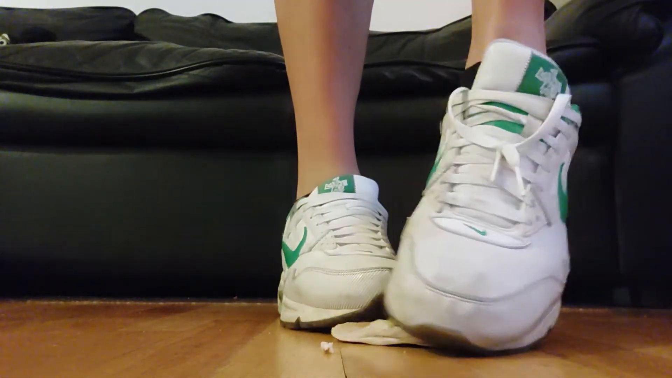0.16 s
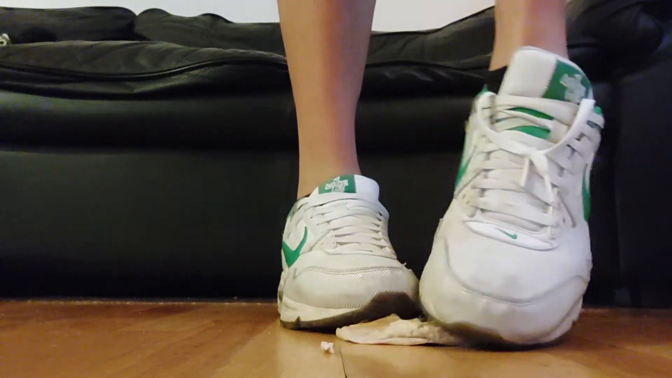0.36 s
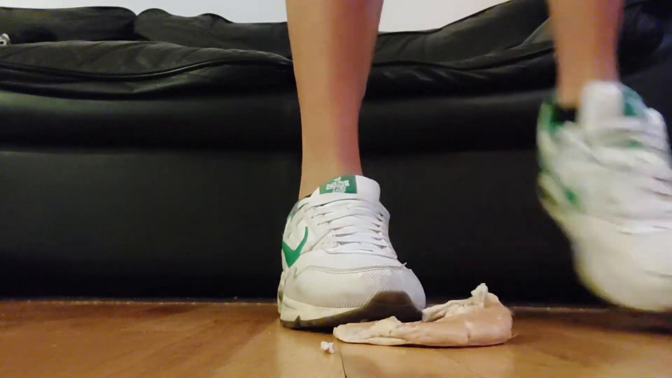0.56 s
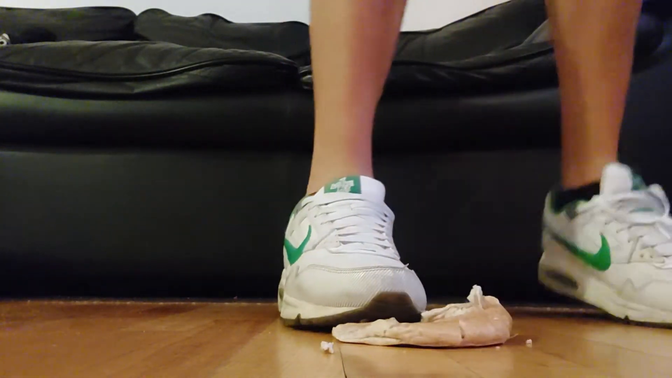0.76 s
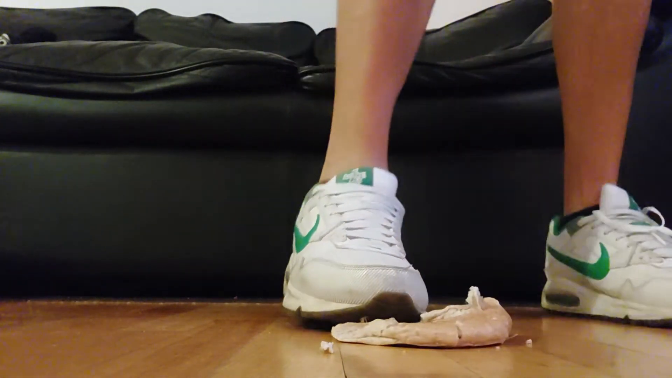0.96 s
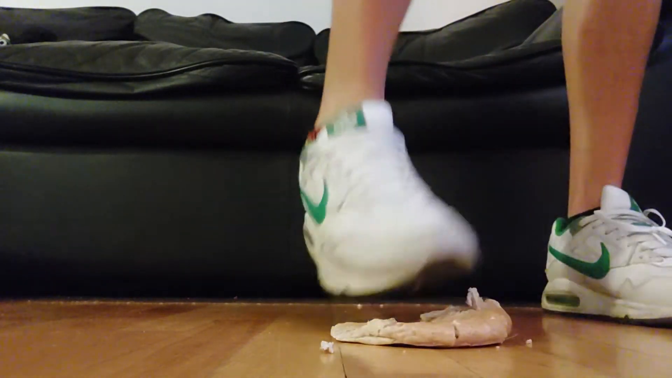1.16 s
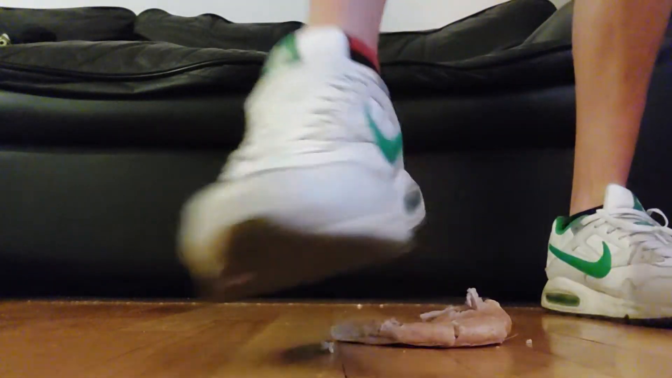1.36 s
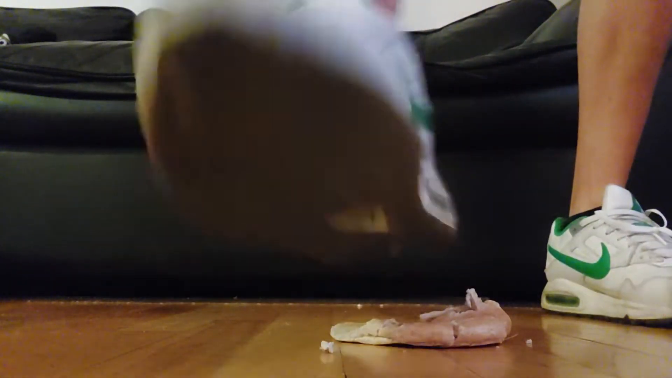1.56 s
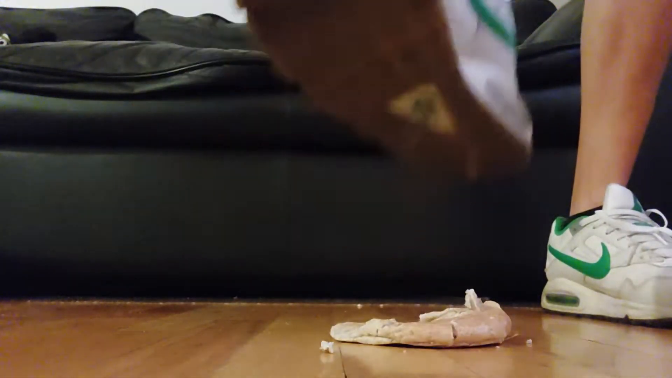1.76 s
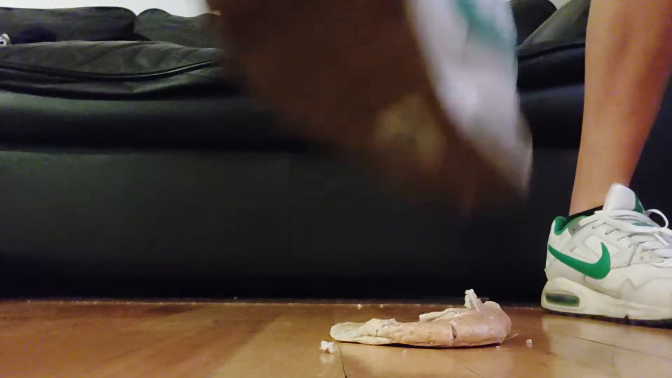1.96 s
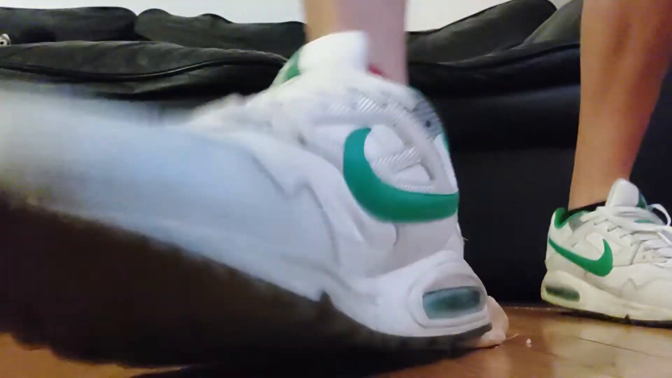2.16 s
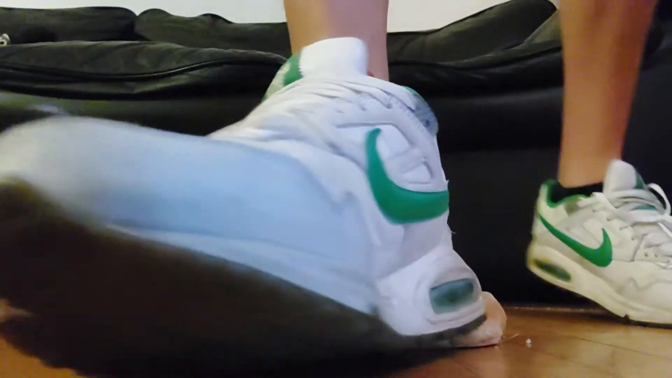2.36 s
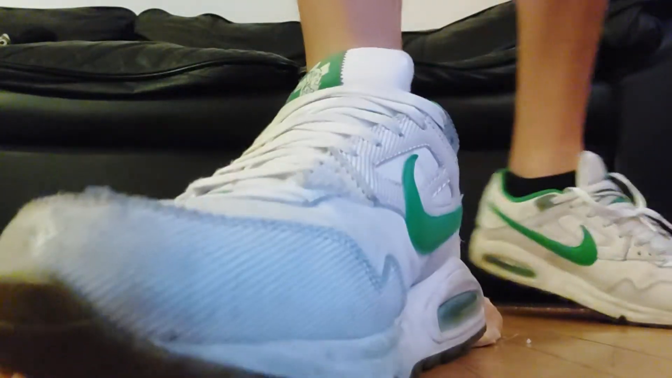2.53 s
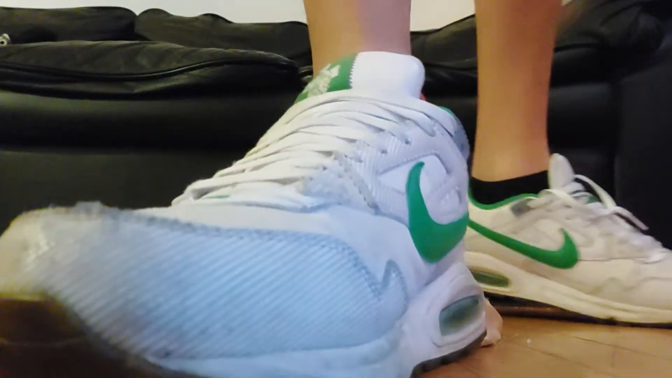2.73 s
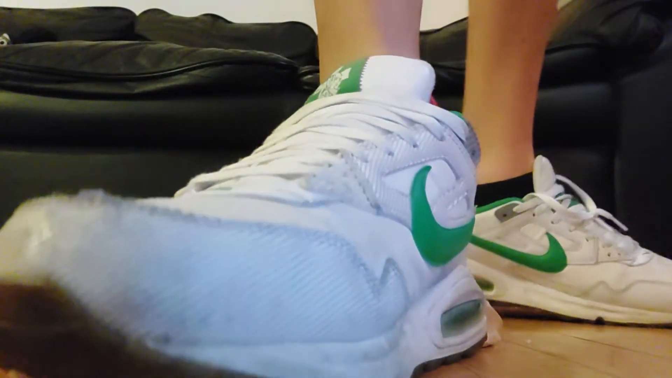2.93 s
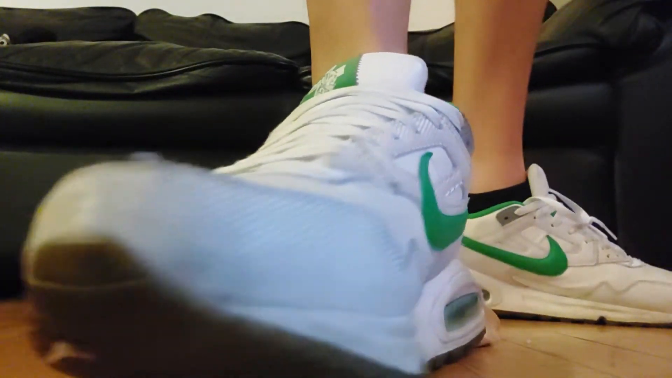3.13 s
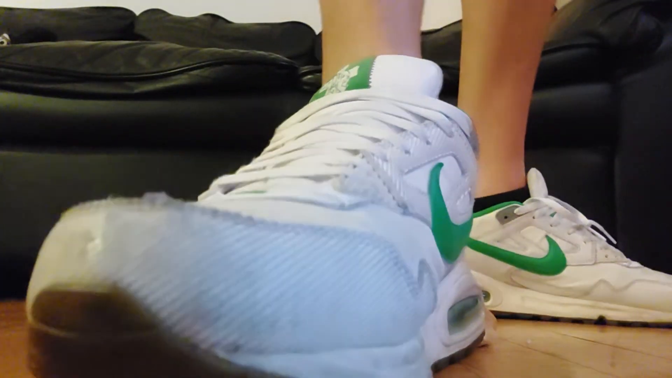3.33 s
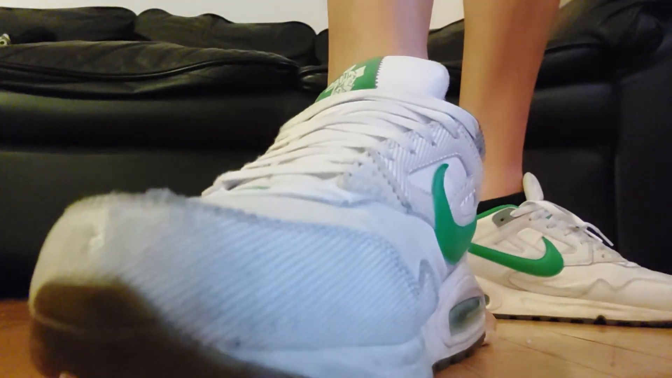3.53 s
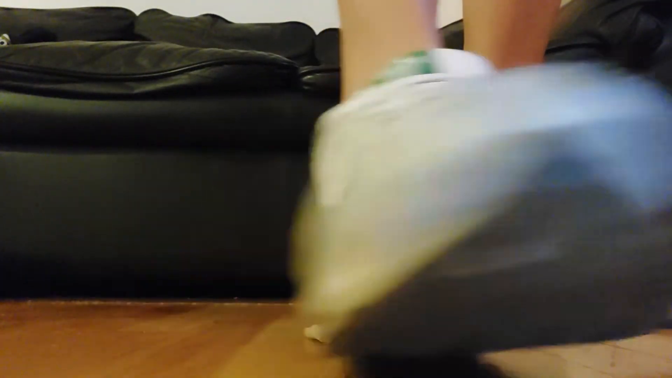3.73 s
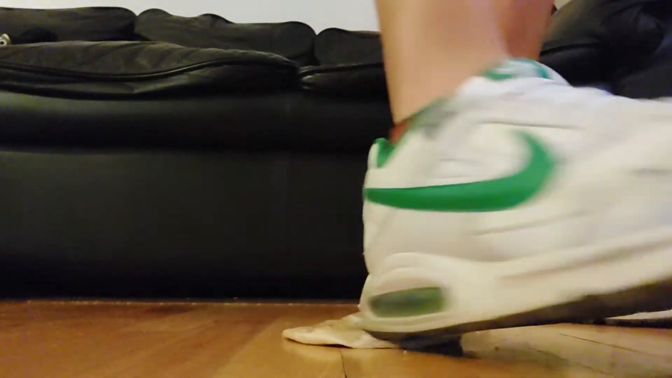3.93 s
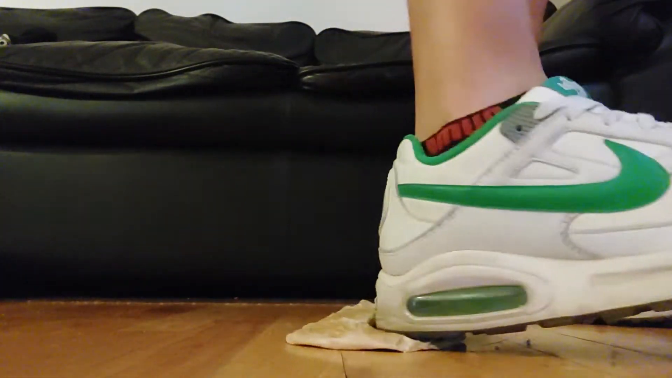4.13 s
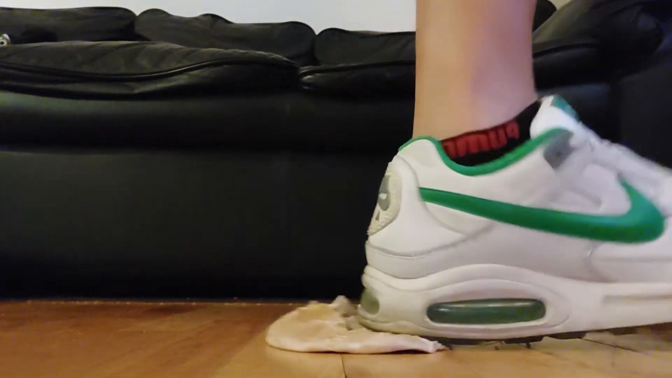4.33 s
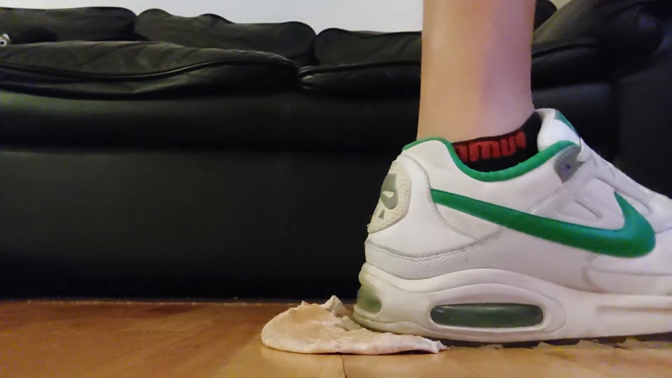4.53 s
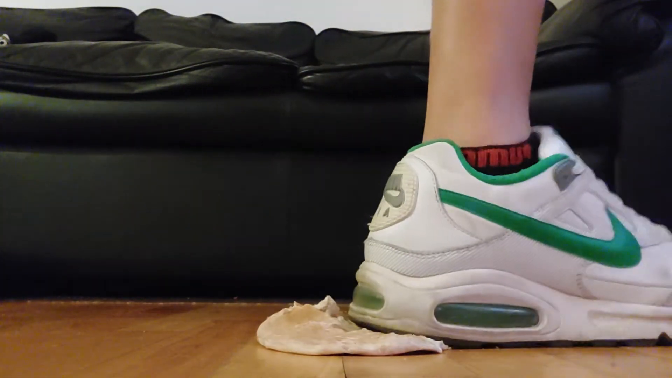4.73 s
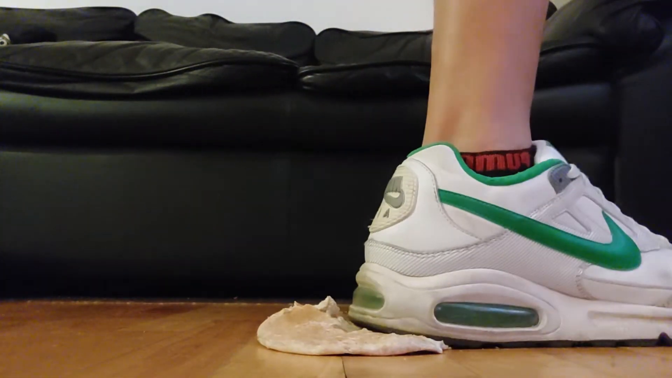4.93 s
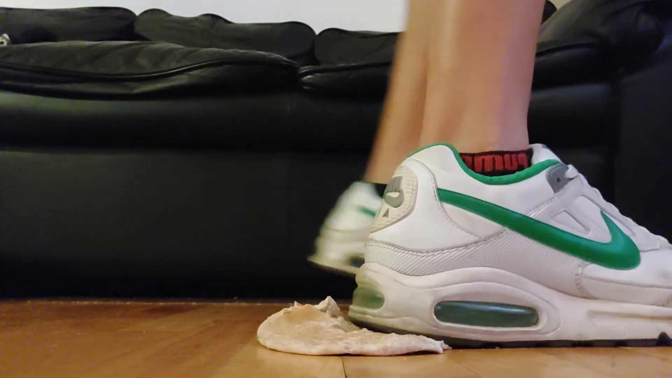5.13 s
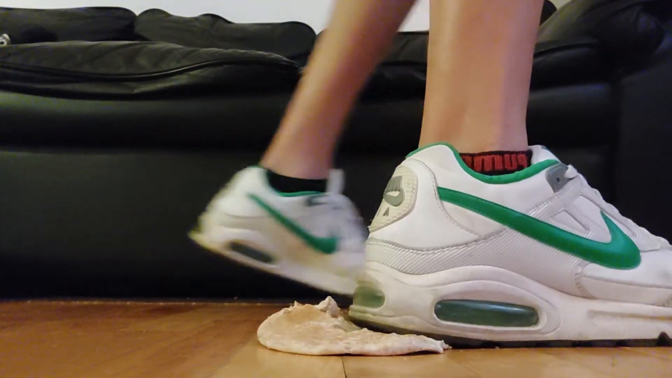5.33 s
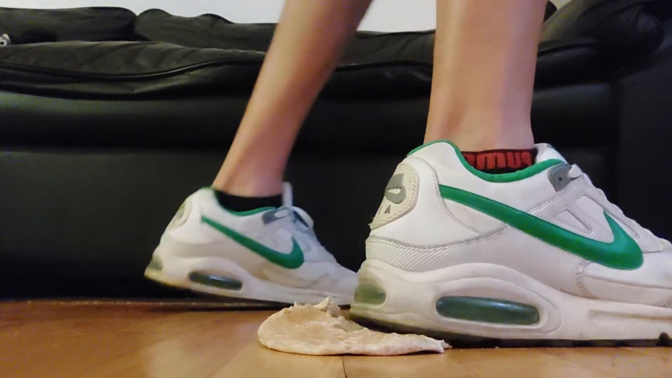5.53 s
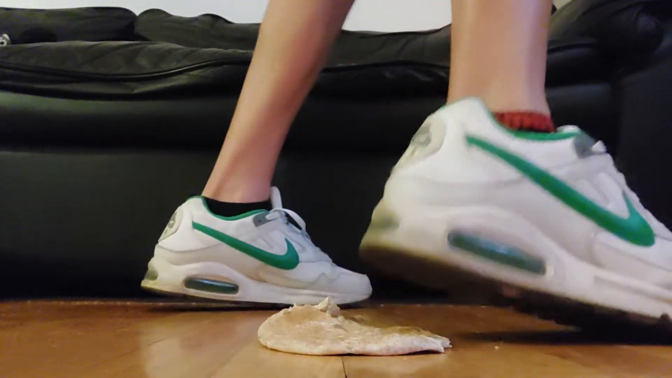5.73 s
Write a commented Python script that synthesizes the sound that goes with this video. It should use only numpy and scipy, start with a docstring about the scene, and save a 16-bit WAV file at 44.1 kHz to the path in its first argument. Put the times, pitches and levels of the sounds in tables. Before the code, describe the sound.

Close stereo pickup at floor level in a small room with low steady hum. Rubber soles tick and scrape grittily over boards and crumbs, with soft footfalls and small shoe creaks. At about two seconds a very loud hollow wooden stomp lands with a short wet, tearing burst of bread. A faint rising rasp, quiet rustling and small steps follow, ending in a moderate thump and scuff.

```python
"""Sneakers on bread

Close by, sneakers step around soft bread on a wooden floor, stomp it flat and grind it.
Footfalls ring the modes of the boards; ticks, creaks and crackles are clicks with set spectra.
Scuffs, rustles and the bursting bread are shaped noise; a thin rasp is noise shifted to a rising pitch.
A small room answers with decaying noise taps, over room noise and a low hum."""
import sys
import numpy as np
from scipy import signal
from scipy.fft import rfft, irfft
from scipy.io import wavfile
from scipy.ndimage import uniform_filter1d

SR = 44100
rng = np.random.default_rng(int(sys.argv[2]) if len(sys.argv) > 2 else 0)


def wav_record(signal):
    """Record a signal, one row per channel, as 16-bit PCM in the file named by sys.argv[1]."""
    frames = np.transpose(np.atleast_2d(signal))
    bounded = np.clip(frames, -1, 1)
    # unit amplitude maps onto the largest positive 16-bit level
    quanta = np.round(bounded * 32767).astype(np.int16)
    wavfile.write(sys.argv[1], SR, quanta)


N = 259308
TIME, HZ = np.arange(N) / SR, np.fft.rfftfreq(N, 1 / SR)
SHORT_HZ = np.fft.rfftfreq(4096, 1 / SR)
# diffuse sound: f/Hz, left-right likeness (0 to 1)
LIKENESS = [(60, 0.71), (300, 0.78), (640, 0.34), (1400, 0.05), (15000, 0.057)]


def boards():
    """Each footfall pushes the floor and wakes the modes near its push pitch."""
    # weight landing: t/s, level/dB, push f/Hz, spread/octaves, ring time as a share (a planted foot damps),
    # room send/dB
    footfalls = [(0.7066, -26.5, 308, 0.79, 0.8, -3.5), (0.728, -33, 270, 0.45, 1, -3.5),
                 (0.787, -40, 450, 0.78, 0.32, -4), (1.138, -30.5, 465, 0.92, 0.42, -22),
                 (1.158, -40, 277, 1, 1, -3.5), (2.0784, -4, 139, 0.56, 0.94, -25.5),
                 (2.0901, -3, 309, 0.3, 0.91, -14), (2.1108, -14.5, 165.4, 2, 0.79, -30.5),
                 (2.1517, -18, 206, 0.88, 0.81, -14.5), (2.21, -31, 220, 1.16, 0.76, -8),
                 (2.486, -40, 450, 0.45, 0.53, -16), (2.5006, -40, 300, 0.5, 0.48, -18),
                 (2.522, -39, 270, 0.3, 0.45, -20), (3.05, -46.5, 250, 0.27, 0.93, -9.5),
                 (3.273, -40, 328, 0.51, 0.62, -10), (3.95, -40, 252, 0.48, 0.44, -7),
                 (4.627, -40.5, 485, 0.76, 0.45, -6.5), (4.806, -35.5, 450, 0.88, 0.46, -7),
                 (4.8666, -31.5, 417, 0.51, 0.3, -15), (5.281, -41, 338, 0.5, 0.32, -13),
                 (5.4526, -19.5, 277, 0.12, 0.56, -15.5), (5.645, -35, 298, 0.44, 0.48, -11)]
    # wooden floor modes: f/Hz, relative level/dB, t60/s at full ring
    floor_modes = [(66, -20.5, 0.25), (138.2, -0.5, 0.28), (166, 5.5, 0.16), (224.1, -13.5, 0.44),
                   (235.4, -8.5, 0.2), (251.1, -1, .14), (290.2, -15, .12), (321, -19, 0.1),
                   (453, -8.5, 0.049), (585, -13, 0.13), (736, -23.5, 0.16)]
    t, direct, spill = TIME[:SR // 2], np.zeros(N), np.zeros(N)
    hz, db, t60_s = np.transpose(floor_modes)[:, :, None]
    for s, level_db, push_hz, octaves, ring, room_db in footfalls:
        share = amp(db) * np.exp(-(np.log2(hz / push_hz) / octaves) ** 2 / 2)
        decay = np.exp(-np.log(1000) * t / (t60_s * ring))
        modes = share * np.sin(2 * np.pi * hz * t) * decay
        thud = modes.sum(0) * (np.exp(-t / 0.0013) - 1)  # the floor first moves down
        thud = amp(level_db) * thud / abs(thud).max()
        add(direct, s, thud)
        add(spill, s, amp(room_db) * thud)
    sound = direct * sides(db=2.6) + room(spill, wet_db=1.0, near_db=-0.5)
    # a standing wave in the room cancels one low band
    sound = signal.lfilter(*signal.iirnotch(92, 3.5, fs=SR), sound)
    # boards radiate little deep bass
    return signal.sosfilt(signal.butter(2, 70, "highpass", fs=SR, output="sos"), sound)


def squash(s=2.079, burst_db=-29, ooze_db=-58, ooze_s=0.045):
    """The bread bursts under the heel in a brief spray of tiny tears, then spreads more quietly."""
    after_s = np.maximum(TIME - s, 0)
    swell = amp(burst_db) * np.exp(-after_s / .006) + amp(ooze_db) * np.exp(-after_s / ooze_s)
    swell *= np.exp(np.minimum(TIME - s, 0) / 0.002)  # onset
    # tearing spectrum: f/Hz, level/dB
    colour = [(300, -2.5), (700, -2.0), (1000, -2.5), (1450, -1.0), (2000, -5.0), (2600, -5.5),
              (3400, -10.5), (7000, -17.5), (9000, -31.5), (16000, -29)]
    tears = noise(read(colour, HZ), grain_db=5)
    burst = swell * tears * sides(db=6.5)
    return burst + room(burst, wet_db=-18, near_db=-12, near_s=.003)


def ticks():
    """Short contacts of the sole, each a click with a quick scatter and its own share of the room."""
    # rubber on wood and bread: t/s, level/dB, f/Hz, spread/octaves, left-right/dB, room send/dB
    contacts = [(0.031, -39.5, 1090, 0.76, 1, -19), (0.0681, -27, 754, 1.57, 6.5, -7.5),
                (0.3141, -31.5, 856, 1.18, 5.5, -13), (0.532, -41.5, 1330, 0.74, 6, -12),
                (0.57, -52, 2500, 2.5, 6, -9), (0.667, -44, 840, 0.72, -2, -13),
                (0.7075, -25.5, 570, 1.2, -0.5, -7), (0.786, -42, 527, 0.74, -9, -3),
                (0.8711, -36.5, 870, 0.86, 6, -10), (1.061, -42, 600, .7, 0, -6),
                (1.098, -42.5, 930, 0.48, 8, -17), (1.1393, -43, 690, 0.81, -5, -7),
                (2.078, -24, 1110, 1.77, 14, -10.5), (2.0797, -22, 1090, 1.7, 15.5, -19),
                (2.082, -19.5, 553, 1.4, -6.5, -8.5), (2.093, -35, 3000, 2.4, -1, -14),
                (2.21, -43, 780, 0.75, -1.5, -4), (2.4495, -37, 1500, 1.17, 0, -6),
                (2.6132, -43.5, 1480, 1.02, 8, -17), (3.435, -36.5, 973, 0.9, 3.5, -8),
                (3.67, -51.5, 800, 0.56, -6, -14), (3.705, -47.5, 895, 0.49, -4, -9),
                (3.753, -47, 1220, 1.16, 2, -8), (3.95, -41.5, 1200, 1.86, 7, -2),
                (4.626, -39, 514, .85, -1, -8.5), (4.805, -40.5, 492, 0.88, -4.5, -1.5),
                (4.8668, -40, 640, 1.66, 5.5, -9), (5.281, -47.5, 790, 1.63, 6, -3.5),
                (5.4501, -30.5, 825, 0.81, 1, -3), (5.576, -43, 1800, 2.1, 8, 1),
                (5.598, -40.5, 1400, 2.4, 9, -9), (5.621, -40, 1170, 0.67, -4, -3),
                (5.647, -47, 1370, 1.4, -5, -8)]
    direct, spill = np.zeros((2, N)), np.zeros((2, N))
    for s, db, hz, octaves, pan_db, room_db in contacts:
        tick = amp(db) * sides(pan_db) * click(hump(hz, octaves, slope_db=24.5))
        add(direct, s, tick)
        add(spill, s, amp(room_db) * tick)
    scatter = room(direct, wet_db=-30, near_db=-4, near_s=.003)
    return direct + scatter + room(spill, wet_db=0, near_db=-20)


def creaks(chatter_s=0.00029):
    """The shoe sticks and slips: single snaps, or a quick uneven run of them."""
    # single slips of a flexing shoe: t/s, relative level/dB
    single_slips = [(0.871, -37.5), (1.01, -37), (1.434, -35), (1.464, -32), (1.8821, -34.5), (1.8928, -31),
                    (1.9045, -32.5), (1.908, -32), (1.9183, -28.5), (1.9432, -31), (2.055, -33)]
    # shoe spectrum: f/Hz, level/dB
    shoe_colour = [(200, -9), (600, 3.5), (820, -3.5), (990, 5.5), (1400, -8), (1750, -7.5), (2150, -3.5),
                   (2600, -14.5), (3200, -15.5), (4800, -17.5), (7200, -24.5), (9500, -38.5),
                   (16000, -40.5)]
    slips = np.zeros(N)
    for s, db in single_slips:
        slips[round(s * SR)] += amp(db)
    # the foot peels off the floor: slips come faster and louder as it bends, then die away
    bend = stroke(s=0.96, rise_s=0.072, fall_s=.085)
    wander = unit(uniform_filter1d(rng.standard_normal(N), size=200))
    slips_per_s = 170 * bend ** .2 * np.exp(.1 * wander)
    count = np.floor(np.cumsum(slips_per_s) / SR)
    run = np.diff(count, prepend=0) > 0
    slips += run * np.sqrt(bend) * amp(-33 + 2 * rng.standard_normal(N))
    fade = np.exp(-TIME[:SR // 50] / chatter_s)  # each slip chatters briefly before it grips again
    envelope = signal.fftconvolve(slips, fade / np.linalg.norm(fade))[:N]
    chatter = envelope * rng.standard_normal(N)
    snaps = through(chatter + slips, click(read(shoe_colour, SHORT_HZ)))
    around = room(snaps, wet_db=-4, near_db=1, near_s=.003)
    return (snaps + around) * amp(db=-5.5) * sides(db=0.0)


def scuffs(crumbs_per_s=350):
    """Tread drags over wood and crumbs: gritty rubbing, small crackles, a fine hiss and a rumble in the boards."""
    # sole strokes: t/s when fastest, speeding up/s, slowing down/s, then relative levels:
    # rubbing/dB, fine hiss/dB, rumble in the boards/dB
    strokes = [(0.0, .02, 0.15, -50.5, -69.5, -48.5), (0.301, .1, 0.1, -55.5, -66, -51.5),
               (0.54, 0.15, 0.13, -57.5, -69, -49.5), (0.79, 0.14, .11, -60.5, -71, -46.5),
               (0.99, 0.17, 0.14, -52, -78, -44), (1.136, 0.022, 0.038, -54.5, -57.5, -42),
               (2.47, 0.14, 0.094, -54.5, -73, -55), (2.555, 0.062, 0.058, -54, -85, -53),
               (3.72, 0.12, 0.23, -65, -85, -54), (3.95, 0.073, 0.097, -63.5, -84, -54),
               (4.35, .13, 0.11, -66.5, -76, -53), (4.882, 0.033, 0.086, -57.5, -86.5, -49.5),
               (5.47, 0.021, 0.037, -61.5, -76, -52), (5.541, .07, 0.064, -62, -92, -47),
               (5.632, 0.05, 0.044, -48.5, -75, -46), (5.79, 0.091, 0.13, -67, -95, -55)]
    # rubbing spectrum: f/Hz, level/dB
    rub_colour = [(250, -13.5), (600, 8.5), (800, 1), (1020, 5.5), (1250, -2.5), (1500, -1.5), (2100, -4),
                  (2600, -10), (3100, -13), (4100, -15), (4800, -14), (5700, -22), (7300, -20),
                  (9500, -33.5), (16000, -35)]
    # fine hiss spectrum: f/Hz, level/dB
    hiss_colour = [(2000, 2), (6000, -3), (9500, -9), (14000, -2), (16000, -22)]
    # board rumble spectrum: f/Hz, level/dB
    rumble_colour = [(25, -34), (70, -16), (125, -7), (230, 2.5), (400, -2.5), (600, -12), (1000, -30),
                     (3000, -51)]
    rub_law, hiss_law, rumble_law = 1.22, 1.1, 0.96  # powers of the sliding speed
    level = np.zeros((3, N))
    for s, rise_s, fall_s, rub_db, hiss_db, rumble_db in strokes:
        speed = stroke(s, rise_s, fall_s)
        level[0] += amp(rub_db) * speed ** rub_law
        level[1] += amp(hiss_db) * speed ** hiss_law
        level[2] += amp(rumble_db) * speed ** rumble_law
    level = linger(level)
    # the tread grips unevenly
    catch = amp(0.56 * unit(uniform_filter1d(rng.standard_normal(N), size=160)))
    rub = level[0] * catch * noise(read(rub_colour, HZ), grain_db=1.5) * amp(-3.0) * sides(db=3)
    hits = (rng.random(N) < crumbs_per_s / SR) * rng.standard_normal(N)
    crumbs = through(hits, click(read(rub_colour, SHORT_HZ)))
    around = room(crumbs, wet_db=-9, near_db=0, near_s=.0015)
    crackle = level[0] * unit(crumbs + around) * amp(-2.5)
    hiss = level[1] * noise(read(hiss_colour, HZ), grain_db=4) * amp(0.5) * sides(db=7.5)
    rumble = level[2] * noise(read(rumble_colour, HZ)) * amp(0.5)
    return rub + crackle + hiss + rumble


def squeal(width_hz=170):
    """Rubber creeps under the full weight with a thin, rough rasp of rising pitch."""
    s, start_hz, hz_per_s = 2.28, 1420, 650  # time of peak, pitch there, glide
    flutter = noise(-20 * np.log10(1 + (HZ / width_hz) ** 2))
    turn = np.exp(2j * np.pi * np.cumsum(start_hz + hz_per_s * (TIME - s)) / SR)
    rasp = (flutter + 1j * flutter[:, ::-1]) * turn  # reversed copy as a second, unrelated flutter
    return rasp.real * amp(-70) * np.sqrt(stroke(s, rise_s=0.14, fall_s=0.26))


def rustles():
    """The cloth upper rubs softly as the foot shifts inside it."""
    # cloth shifting: t/s when fastest, speeding up/s, slowing down/s, relative level/dB
    shifts = [(1.69, 0.068, .08, -84), (2.84, 0.13, 0.068, -85), (3.185, 0.093, 0.064, -73.5),
              (3.77, 0.14, 0.22, -71), (4.06, 0.12, 0.12, -76), (4.35, 0.077, 0.13, -73.5)]
    # cloth spectrum: f/Hz, level/dB
    cloth_colour = [(500, -10), (1500, 0.5), (2700, -1.5), (5000, -7.5), (7000, -12.5), (10000, -23),
                    (16000, -28)]
    level = sum(amp(db) * stroke(s, rise_s, fall_s) for s, rise_s, fall_s, db in shifts)
    return linger(level) * noise(read(cloth_colour, HZ), grain_db=2.5) * sides(db=7.0)


def hum():
    """Steady room noise with a few wavering bands of hum; it dips for a while."""
    # room noise spectrum: f/Hz, relative level/dB
    air_colour = [(18, -99.5), (30, -37.5), (237, -8), (270, -7), (299, -9), (443, -16), (561, -19.5),
                  (1050, -36), (1230, -36.5), (1330, -45.5), (1440, -40.5), (4660, -51), (6720, -47),
                  (9430, -52), (15500, -50.5)]
    # narrow bands of the hum: f/Hz, width/Hz, relative level/dB
    hum_bands = [(120.9, 4, -80), (269, 35, -67), (404, 33, -70), (438.7, 10, -74.5), (5430, 60, -102),
                 (7480, 1500, -96.5)]
    power = 0
    for hz, width_hz, db in hum_bands:
        resonance = unit(1 / (1 + (2 * (HZ - hz) / width_hz) ** 2))
        power = power + (amp(db) * resonance) ** 2
    bands = np.sqrt(power.mean()) * noise(10 * np.log10(power))
    wash = amp(-65.5) * noise(read(air_colour, HZ))
    dip = stroke(s=2.82, rise_s=0.71, fall_s=0.96)  # while the shoe rests on the bread
    return (wash + bands) * amp(7.5 - 5.5 * dip)


def room(x, wet_db, near_db, near_s=0.011):
    """Reflections alone: a quick scatter from floor and sofa, and a tail that dies band by band."""
    # reverberation: f/Hz, t60/s
    reverb = [(100, .33), (300, .34), (1000, .36), (2500, .38), (6000, .4), (9000, .3), (16000, .2)]
    taps = rng.standard_normal((2, SR // 2))
    hz, t, z = signal.stft(taps, SR, nperseg=256)
    same = np.clip(read(LIKENESS, hz), 0, 1)[:, None]
    z[1] = same * z[0] + np.sqrt(1 - same ** 2) * z[1]
    tail = signal.istft(z * amp(-60 * t / read(reverb, hz)[:, None]), SR, nperseg=256)[1]
    t = TIME[:tail.shape[1]]
    near = tail * np.exp(-t / near_s) * (t > .0005)
    tail = tail * np.minimum(t / 0.0026, 1)
    wet = amp(wet_db) * tail / np.linalg.norm(tail[0])
    scatter = amp(near_db) * near / np.linalg.norm(near[0])
    return through(x, wet + scatter)


def stroke(s, rise_s, fall_s):
    """One movement, 0 to 1 and back: it gathers until time s, then eases off."""
    u = np.linspace(-1, 1, 129)
    return np.interp(TIME, s + u * np.where(u < 0, rise_s, fall_s), (1 - u ** 2) ** 1.5)


def linger(level, share_db=-9, fade_s=.035):
    """Lets a share of a level hang in the room and die away."""
    keep = np.exp(-1 / (fade_s * SR))
    power = level ** 2 + 1e-20
    return np.sqrt(power + amp(share_db) ** 2 * signal.lfilter([1 - keep], [1, -keep], power))


def leaning(x):
    """Tilts a sound between left and right, band by band."""
    # rubbing and rustling reach the left side brighter: f/Hz, left-right/dB
    lean = [(200, 1), (450, -2), (800, -4), (1400, -1.5), (2200, 2), (4000, 5.5), (7000, 3.5), (14000, -4)]
    return irfft(rfft(x) * amp(np.outer([.5, -.5], read(lean, HZ))), N)


def noise(db, grain_db=0):
    """Stereo noise of a given spectrum, rms 1; uneven grain sizes make it gritty."""
    grain = amp(grain_db * np.minimum(rng.exponential(1, (2, N)), 6))
    a, b = rfft(rng.standard_normal((2, N)) * grain)
    same = np.clip(read(LIKENESS, HZ), 0, 1)
    return unit(irfft(np.array([a, same * a + np.sqrt(1 - same ** 2) * b]) * amp(db), N))


def click(db):
    """The sharpest causal (minimum-phase) click with this spectrum, peak 1."""
    log_gain = np.log(amp(np.maximum(db - db.max(), -90)))
    circle = np.concatenate([log_gain, log_gain[-2:0:-1]])
    pulse = np.fft.ifft(np.exp(np.conj(signal.hilbert(circle)))).real[:len(db)]
    return pulse / abs(pulse).max()


def hump(hz, octaves, slope_db):
    """A spectrum in dB, round at the top, with straight skirts."""
    return slope_db * (1 - np.hypot(1, np.log2((SHORT_HZ + 1) / hz) / octaves))


def through(x, response):
    """Convolves, giving two channels."""
    return signal.fftconvolve(np.atleast_2d(x), np.atleast_2d(response), axes=1)[:, :N] * np.ones((2, 1))


def add(mix, s, sound):
    """Mixes a sound in at time s."""
    part = mix[..., round(s * SR):][..., :sound.shape[-1]]
    part += sound[..., :part.shape[-1]]


def sides(db):
    """Left and right gains for a level difference."""
    return amp(np.array([[db], [-db]]) / 2)


def read(points, hz):
    """Reads a spectrum on a log-frequency axis."""
    f, value = np.transpose(points)
    return np.interp(np.log(hz + 1), np.log(f + 1), value)


def unit(x):
    """Scales to rms 1."""
    return x / np.sqrt(np.mean(x ** 2) + 1e-20)


def amp(db):
    """Decibels to gain."""
    return 10 ** (np.asarray(db) / 20)


def scene():
    """Everything heard at floor level."""
    shoe_contacts = boards() + squash() + ticks() + creaks()
    rubbing = leaning(scuffs() + rustles())
    return shoe_contacts + rubbing + squeal() + hum()


def record(dry):
    """Full-scale limit, then the band limit."""
    lowpass = signal.firwin(511, 15850, window=("kaiser", 9), fs=SR)  # cutoff in Hz
    return signal.oaconvolve(np.clip(dry, -1, 1), lowpass[None], "same")


dry = scene()
out = record(dry)
wav_record(out)
```